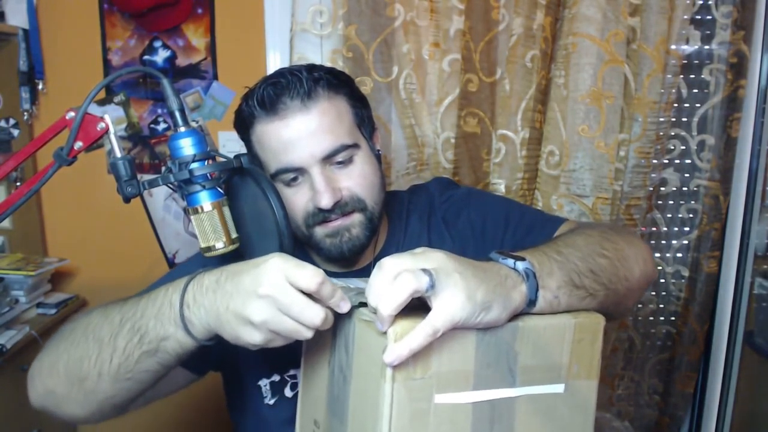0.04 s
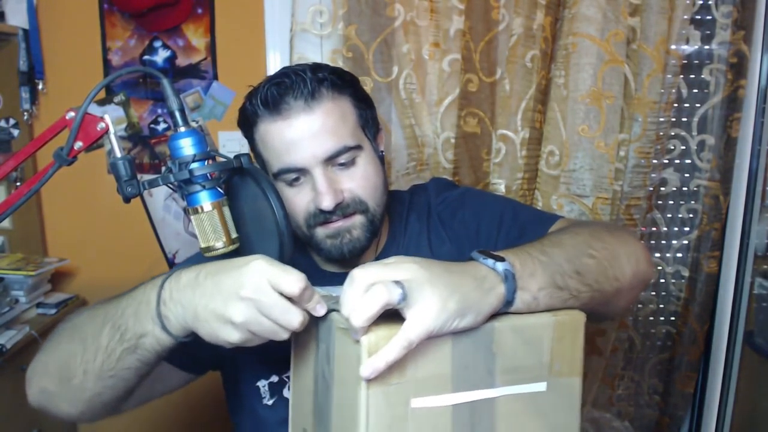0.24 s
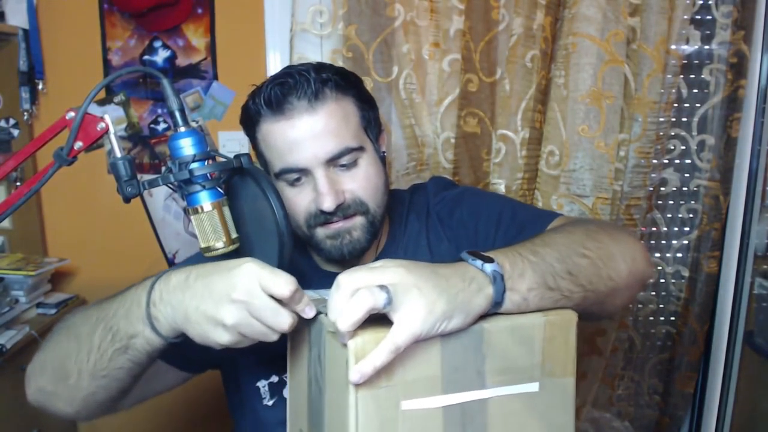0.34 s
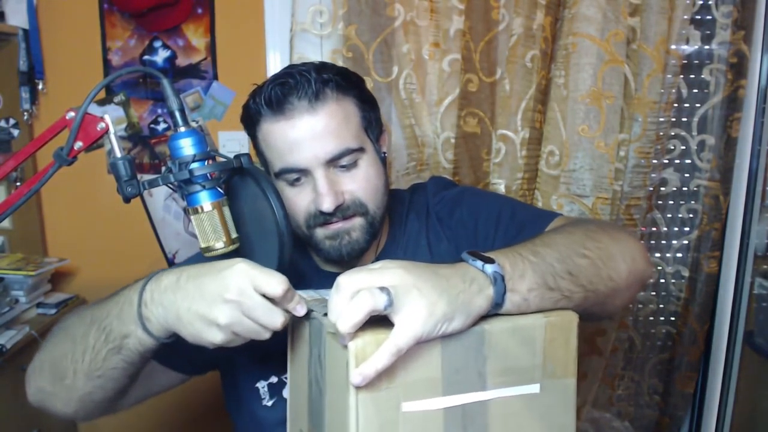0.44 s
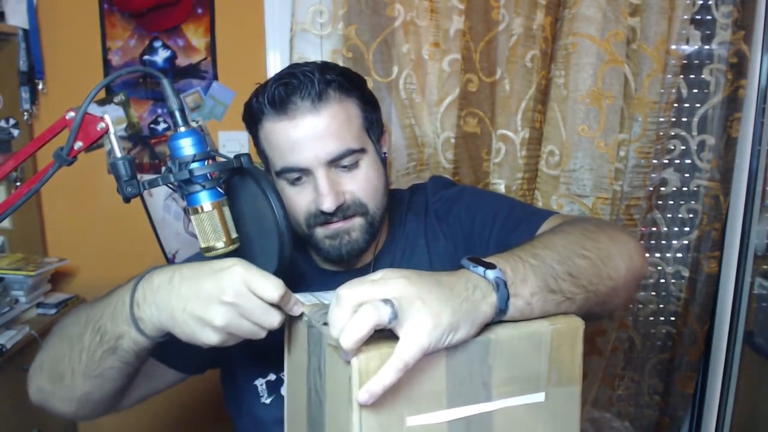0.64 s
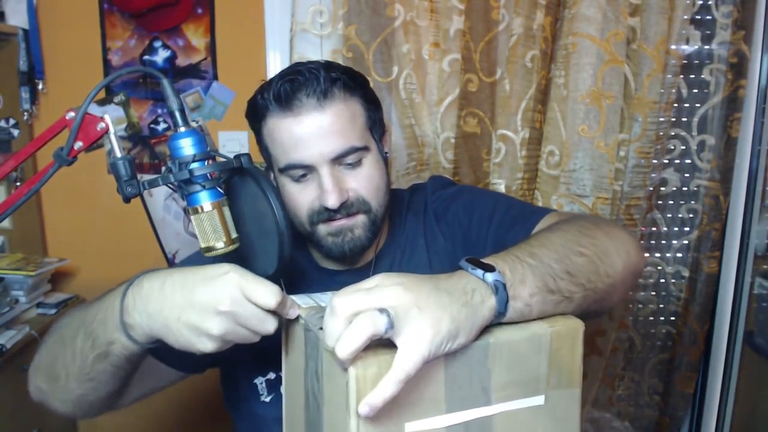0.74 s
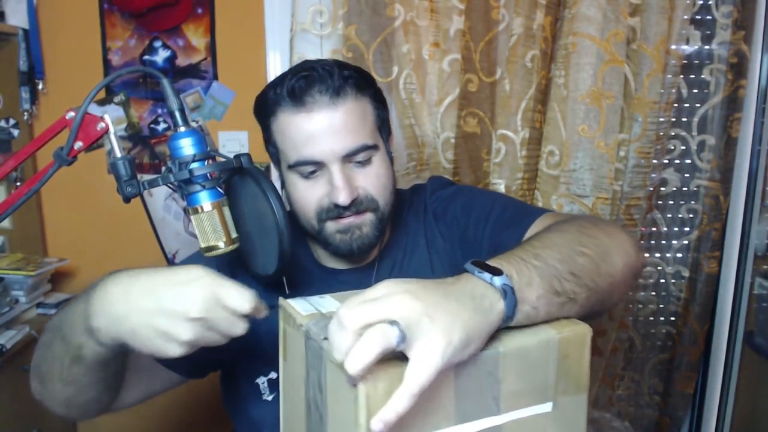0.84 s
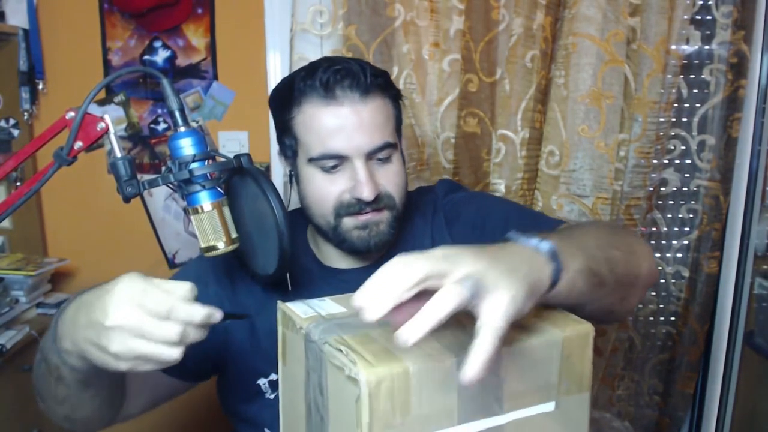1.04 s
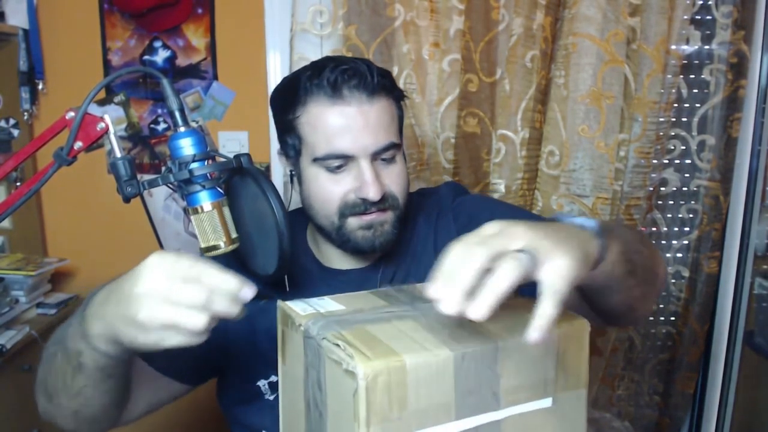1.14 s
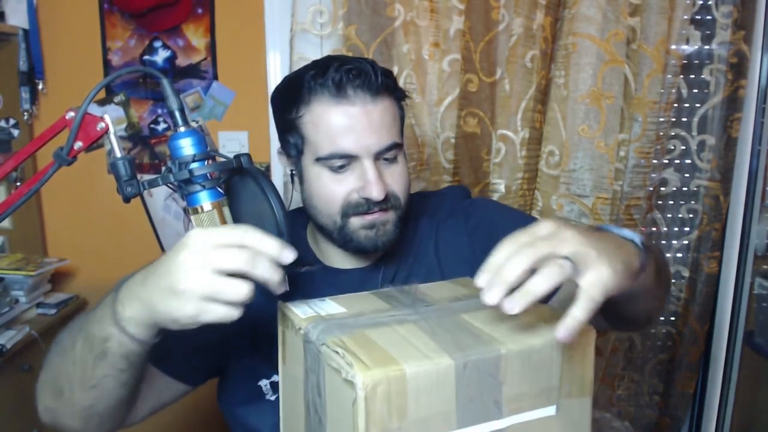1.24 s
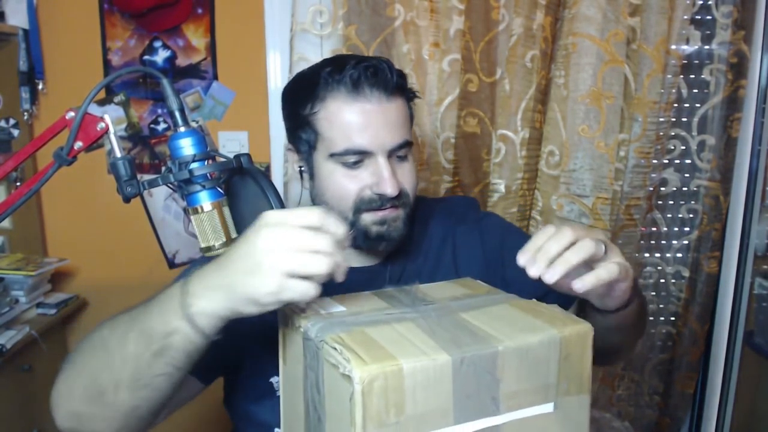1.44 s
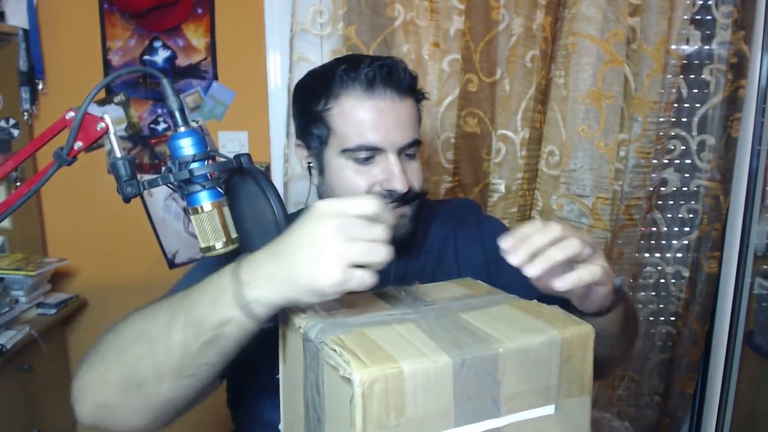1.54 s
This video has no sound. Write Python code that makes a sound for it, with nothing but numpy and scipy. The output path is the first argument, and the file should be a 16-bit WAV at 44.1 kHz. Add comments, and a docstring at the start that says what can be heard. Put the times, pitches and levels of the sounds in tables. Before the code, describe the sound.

Packing tape ripped off a cardboard box in short, crackling pulls with dull box knocks, indoors

```python
"""Packing tape ripped off a box

Tape is picked at and ripped off a cardboard box in short pulls, close to a desk microphone.
Stick-slip of the glue line crackles and snaps through filtered noise shaped by film resonances.
The box walls knock as damped sines and creak as clicks through modes; low noise shakes the desk.
Faint rustle, quiet noise and a mains hum lie underneath, and a small damped room adds its echo."""
import sys
import numpy as np
from scipy import signal
from scipy.io import wavfile
from scipy.ndimage import uniform_filter1d

SR = 44100
rng = np.random.default_rng(int(sys.argv[2]) if len(sys.argv) > 2 else 0)


def digitize_waveform(pressure):
    """Quantize a signal to 16-bit integers and store it at the path in sys.argv[1].

    Rows of a 2-D input are taken as channels; values are limited to [-1, 1].
    """
    field = np.atleast_2d(pressure).T
    bounded = np.clip(field, -1, 1)
    quanta = np.round(bounded * 32767).astype(np.int16)
    wavfile.write(sys.argv[1], SR, quanta)


N = 70560
GRAIN_LAG_S = 0.005  # crackle and creak follow their level tables this much later


def undb(db):
    """Level definition: dB to amplitude gain."""
    return 10 ** (np.asarray(db) / 20)


def unit(x):
    """Normalisation: scale to rms 1."""
    return x / np.sqrt(np.mean(x ** 2))


def decay(t, t60_s):
    """Exponential damping: a fall of 60 dB in t60_s."""
    return np.exp(-np.log(1000) * t / t60_s)


def band(x, hz, width_hz):
    """Simple resonance: a peak filter with gain 1 at the centre."""
    centre_hz = min(hz, 0.45 * SR)
    q = max(hz / width_hz, 0.3)
    return signal.lfilter(*signal.iirpeak(centre_hz, q, fs=SR), x)


def body(x, modes):
    """Modal superposition: twice-filtered resonances summed with alternating sign."""
    out = 0
    for k, (hz, width_hz, db) in enumerate(modes):
        pass_hz = 1.8 * width_hz  # each pass is wider, as two passes narrow the peak
        mode = band(band(x, hz, pass_hz), hz, pass_hz)
        out = out + (-1) ** k * undb(db) * mode
    return out


def cut(x, hz, kind, order=2):
    """Maximally flat filtering: a Butterworth low or high pass."""
    return signal.sosfilt(signal.butter(order, hz, kind, fs=SR, output="sos"), x)


def level(tables, column, lag_s=0):
    """Amplitude envelope: one dB column, interpolated through all tables, as gain."""
    rows = np.concatenate([np.array(table) for table in tables])
    t = np.arange(N) / SR - lag_s
    return undb(np.interp(t, rows[:, 0], rows[:, column]))


def clicks(per_s, spread_db):
    """Poisson-like impulses: random times and signs, with a long tail of sizes."""
    hits = rng.random(N) < per_s / SR
    signs = np.sign(rng.standard_normal(N))
    return hits * signs * undb(spread_db * rng.exponential(size=N))


def walk(per_s):
    """Slow random modulation: held random levels, smoothed twice, with spread near 1."""
    hold = int(SR / per_s)
    steps = np.repeat(rng.standard_normal(N // hold + 1), hold)
    return 1.3 * uniform_filter1d(uniform_filter1d(steps, hold), hold)[:N]


def even(x, span_s):
    """Level equalisation: hold the running rms of a noise near 1."""
    power = uniform_filter1d(x ** 2, int(span_s * SR))
    return x / np.sqrt(power + 1e-18)


def hiss(spectrum, flicker_db):
    """Filter-bank synthesis: narrow noise bands follow a spectrum and flicker independently."""
    f, density_db = np.array(spectrum).T
    octaves = np.arange(0, np.log2(f[-1] / f[0]), 1 / 5)
    out = 0
    for hz in f[0] * 2 ** octaves:
        db = np.interp(np.log(hz), np.log(f), density_db) + flicker_db * walk(24)
        noise = rng.standard_normal(N)
        for _ in range(3):
            noise = band(noise, hz, hz / 4)
        out = out + undb(db) * noise
    return unit(out)


# relative spectrum of the rustle: f/Hz, level/dB (per Hz)
RUSTLE_SPECTRUM = [(150, -3.5), (230, 4.5), (360, 1), (480, -15.5), (680, -2.5), (850, -14.5), (1100, -28),
                   (1450, -29), (2100, -10.5), (2500, -21), (2800, -20), (3600, -27.5), (5000, -30.5),
                   (7500, -24.5), (10000, -30), (16000, -34)]
# rms level of the rustle over time: t/s, level/dB
RUSTLE_LEVEL = [
    [(0.0, -67), (0.024, -100), (0.058, -70.5), (0.14, -80)],
    [(0.7, -68), (0.718, -59), (0.744, -66.5), (0.8, -65)],
    [(1.2, -63), (1.22, -66), (1.528, -67), (1.6, -94.5)],
]
# relative spectrum of the quiet room: f/Hz, level/dB (per Hz)
QUIET_SPECTRUM = [(56, -33), (95, 3), (123, 5.5), (290, -34), (408, -24.5), (1420, -38), (2000, -43),
                  (2940, -44), (16000, -47)]
QUIET_DB, HUM_HZ, HUM_DB = -77, 120, -68.5  # rms levels


def air():
    """Broadband and tonal background: hand and cloth rustle over quiet noise and a sine hum."""
    rustle = level(RUSTLE_LEVEL, column=1) * hiss(RUSTLE_SPECTRUM, flicker_db=4.5)
    quiet = undb(QUIET_DB) * hiss(QUIET_SPECTRUM, flicker_db=1.0)
    hum = undb(HUM_DB) * np.sqrt(2) * np.sin(2 * np.pi * HUM_HZ * np.arange(N) / SR)
    return rustle + quiet + hum


# shaking of box and desk, one table a pull:
# t/s, low box modes level/dB, high box modes level/dB, desk rumble level/dB
SHAKES = [
    [(0.12, -79, -78, -56), (0.13, -97.5, -77, -73), (0.196, -62, -77, -48), (0.21, -39, -49.5, -40),
     (0.242, -23.5, -27.5, -31), (0.254, -35, -34.5, -20.5), (0.266, -40, -47.5, -41),
     (0.288, -49, -51, -30.5), (0.312, -49.5, -47, -32.5), (0.35, -79, -99, -42), (0.365, -71, -74, -47.5)],
    [(0.366, -88, -59, -43), (0.384, -42, -63, -36.5), (0.392, -39.5, -39, -52), (0.434, -53, -63.5, -43),
     (0.462, -50, -56, -30), (0.484, -39, -40, -32.5), (0.502, -45, -44.5, -25), (0.508, -49, -51, -30),
     (0.52, -47, -55, -39)],
    [(0.521, -26, -42, -23.5), (0.533, -62, -39, -21), (0.549, -23, -29, -25), (0.561, -27, -32, -29),
     (0.583, -30.5, -32, -37), (0.611, -65, -55.5, -24), (0.681, -71.5, -82, -56.5),
     (0.717, -60.5, -81.5, -56), (0.753, -68.5, -75.5, -38.5), (0.8, -62, -74.5, -40)],
    [(0.801, -70, -80, -36), (0.823, -68, -69.5, -55), (0.841, -47, -46, -44.5),
     (0.861, -43.5, -39.5, -37.5), (0.889, -34, -43.5, -58), (0.897, -43, -39, -20),
     (0.909, -35.5, -45, -27.5), (0.941, -66, -58, -32), (0.97, -52, -65, -31)],
    [(0.971, -70, -65, -44), (0.985, -64, -66, -47), (1.001, -49, -63, -41), (1.033, -33.5, -43.5, -23),
     (1.051, -58, -59.5, -41.5), (1.069, -55, -61, -41), (1.099, -66, -85, -49), (1.141, -71, -57, -42),
     (1.175, -71.5, -78, -47), (1.271, -71, -78.5, -48), (1.32, -70, -77.5, -56.5)],
]
SWAY_DB = -55.5  # steady low sway under the pulls


def shake(low_hz, high_hz):
    """Band-limited random vibration: low noise between two cut-offs, held near rms 1."""
    noise = cut(rng.standard_normal(N), high_hz, "low", order=6)
    return even(cut(noise, low_hz, "high"), 0.16)


def desk():
    """Structure-borne vibration: each tug shakes desk and stand over a steady sway."""
    rumble = level(SHAKES, column=3) * shake(10, 43.6)
    sway = undb(SWAY_DB) * shake(7, 33)
    return rumble + sway


# modes of the box: f/Hz, nominal width/Hz, level/dB (relative)
BOX_LOW = [(150, 68, -2.5), (195.4, 34, 4), (279, 34, -1.5), (332.3, 50, -5.5), (434, 73, -2)]
BOX_HIGH = [(531, 53, 6), (680, 76, -7.5), (810, 120, 2.5), (1100, 100, -7), (1450, 330, -4)]
CREAKS_PER_S, CREAK_SPREAD_DB = 2500, 2


def creak():
    """Impulsive excitation of modes: small slips shake the low and high box resonances."""
    slips = clicks(CREAKS_PER_S, CREAK_SPREAD_DB)
    out = 0
    for column, box in ((1, BOX_LOW), (2, BOX_HIGH)):
        out = out + level(SHAKES, column, GRAIN_LAG_S) * even(body(slips, box), 0.015)
    return out


# crackle, one table a pull:
# t/s, low film level/dB, high film level/dB, top film level/dB
PULLS = [
    [(0.12, -93, -99, -90), (0.164, -80, -75.5, -69), (0.204, -74, -79, -78.5), (0.21, -54, -52, -56),
     (0.214, -41, -48, -46), (0.22, -66, -59, -55), (0.226, -39, -34.5, -37.5), (0.244, -36.5, -40.5, -46),
     (0.264, -49.5, -51, -58), (0.308, -59.5, -53.5, -75), (0.334, -75.5, -83, -101),
     (0.35, -108, -89, -107), (0.365, -74, -90.5, -106)],
    [(0.366, -82, -80, -107), (0.376, -61.5, -80, -107), (0.38, -68.5, -76, -73), (0.386, -43.5, -46, -41),
     (0.392, -42, -47, -76), (0.4, -48.5, -50.5, -60.5), (0.414, -49.5, -54, -65.5),
     (0.436, -63.5, -69, -77), (0.454, -51.5, -61, -72), (0.484, -37.5, -43, -52.5),
     (0.496, -47, -47.5, -49.5), (0.53, -44.5, -42, -45.5)],
    [(0.531, -44, -41, -41), (0.541, -41, -37, -43), (0.549, -31, -32.5, -37), (0.559, -34, -34, -40.5),
     (0.587, -33, -36, -41), (0.601, -52, -53, -57.5), (0.653, -62, -62.5, -76), (0.681, -73, -77, -100),
     (0.703, -78, -79.5, -83), (0.715, -66, -65, -84.5), (0.757, -87, -85, -89), (0.8, -92.5, -96.5, -86.5)],
    [(0.801, -78, -79.5, -87), (0.821, -71, -77, -86), (0.827, -64, -55, -66), (0.849, -42.5, -42, -40),
     (0.867, -40.5, -36.5, -51), (0.945, -53.5, -49, -51.5), (0.951, -41.5, -41, -53),
     (0.969, -59.5, -68, -65.5), (0.98, -56, -50, -64.5)],
    [(0.981, -63, -63, -67), (0.989, -54.5, -54, -58.5), (1.019, -50.5, -53, -52),
     (1.029, -41.5, -51, -53.5), (1.047, -56.5, -56.5, -60), (1.083, -56, -65.5, -71.5),
     (1.109, -61, -61.5, -69), (1.137, -57, -51, -68), (1.175, -60.5, -62, -76), (1.233, -85, -89, -97),
     (1.259, -68.5, -67, -80), (1.299, -83.5, -83.5, -90), (1.32, -83.5, -89.5, -107)],
]
# resonances of the tape film: f/Hz, nominal width/Hz, level/dB (relative)
FILM_LOW = [(1640, 400, -5), (2136, 320, 6.5), (3113, 930, 6.5), (3519, 910, 12.5), (4400, 350, -1.5)]
FILM_HIGH = [(5470, 1000, -3), (6840, 830, 2.5), (7970, 900, 2), (8600, 900, -0.5), (9500, 870, 0)]
FILM_TOP = [(11070, 1200, 1), (11100, 2900, -1), (13600, 2600, -8), (15000, 1200, -13)]
GRAINS_PER_S, GRAIN_SPREAD_DB, GRAIN_SMEAR_S = 9000, 2.5, 0.0005
FILM_FLICKER_DB, FILM_FLICKER_PER_S = 2, 25


def crackle():
    """Stick-slip friction: dense glue-line grains ring film resonances that swell independently."""
    smear = np.exp(-1 / (GRAIN_SMEAR_S * SR))
    out = 0
    for column, film in ((1, FILM_LOW), (2, FILM_HIGH), (3, FILM_TOP)):
        impulses = np.abs(clicks(GRAINS_PER_S, GRAIN_SPREAD_DB))
        grains = signal.lfilter([1], [1, -smear], impulses)
        rasp = grains * rng.standard_normal(N)
        rung = 0
        for k, mode in enumerate(film):
            swell = undb(FILM_FLICKER_DB * walk(FILM_FLICKER_PER_S))
            rung = rung + swell * (-1) ** k * body(rasp, [mode])
        out = out + level(PULLS, column, GRAIN_LAG_S) * even(rung, 0.024)
    return out


# snaps of the glue letting go: t/s, peak level/dB, ring f/Hz, burst decay t60/s,
# ring gain level/dB, treble gain level/dB
SNAPS = [(.156, -49.5, 9070, 0.018, 14, 0), (0.2131, -23.5, 2980, .012, 3.5, -5.5),
         (0.2281, -8, 9600, 0.0086, -1.5, 2), (0.238, -13.5, 3600, 0.0078, 8, 2.5),
         (0.2405, -11.5, 9600, 0.018, 8, -10), (0.25, -24, 3950, 0.0098, 6, -2),
         (.303, -42, 7340, .02, 10, -9), (.389, -19, 3970, 0.0092, 26.5, 10),
         (.468, -39, 3800, 0.011, 15, -7), (0.4847, -29.5, 3400, .012, 13, -2),
         (0.5483, -8, 2950, 0.01, 4, 7), (.562, -13, 2810, 0.0091, 9, 2),
         (0.576, -12.5, 7800, .012, 6, 0.5), (0.5793, -10, 9100, 0.015, 14, 9),
         (0.5863, -14.5, 3320, 0.011, 4, 3), (0.7147, -50.5, 6640, 0.014, 24, -19),
         (0.831, -37.5, 7570, 0.019, 15, -0.5), (.844, -26.5, 8150, 0.024, 16, -1),
         (0.852, -19, 7770, 0.0089, 29, 9), (.863, -20.5, 9900, 0.024, 20, 6),
         (.870, -21, 7040, 0.0084, 2, 4), (.9503, -27, 2300, .02, 13, 4), (0.9902, -32, 2870, 0.01, 5, 5.5),
         (1.028, -20.5, 4060, 0.0092, 15, -23), (1.129, -34.5, 6700, 0.019, 9, -4.5),
         (1.1789, -49, 2100, .012, 14.5, 0), (1.2603, -48, 5600, .02, 16, -3.5)]
SNAP_RING_Q, SNAP_RISE_S, SNAP_TICK_DB = 3.2, 0.0001, 13


def snaps():
    """Sudden release of strain: a tick and a decaying noise burst excite film and one ring."""
    length = 4096
    out, t = np.zeros(N + length), np.arange(length) / SR
    for start_s, peak_db, hz, t60_s, ring_db, treble_db in SNAPS:
        rise = 1 - np.exp(-t / SNAP_RISE_S)
        burst = rng.standard_normal(length) * rise * decay(t, max(t60_s, 0.003))
        burst[2:4] += undb(SNAP_TICK_DB) * np.array([1, -1])  # tick
        ring = undb(ring_db) * body(burst, [(hz, hz / SNAP_RING_Q, 0)])
        treble = undb(treble_db) * body(burst, FILM_HIGH + FILM_TOP)
        snap = body(burst, FILM_LOW) + treble + ring
        i = int(start_s * SR)
        out[i:i + length] += undb(peak_db) * snap / np.max(np.abs(snap))
    return out[:N]


# knocks of the box wall: t/s, undamped amplitude level/dB, f/Hz, decay t60/s
KNOCKS = [(.213, -19.5, 78.4, 0.03), (0.214, -20, 445, 0.0092), (.233, -17.5, 97.3, 0.11),
          (0.245, -13.5, 80.5, 0.099), (0.25, -17.5, 204, 0.032), (.252, -17.5, 439, 0.051),
          (0.39, -19, 72, 0.068), (0.391, -26, 455, 0.032), (0.464, -17, 62.4, 0.054), (0.5, -18, 60, 0.05),
          (.536, -14, 78.2, 0.066), (0.551, -20, 219, 0.047), (.555, -21, 323, 0.07),
          (0.564, -18.5, 352, 0.033), (.575, -25, 436, 0.018), (.717, -47, 330, 0.041),
          (0.862, -18.5, 77, 0.072), (0.894, -20, 76.7, 0.087), (.896, -25.5, 729, 0.033),
          (.905, -30, 699, 0.081), (0.993, -20, 86, 0.022), (1.027, -20, 322, 0.026),
          (1.135, -44.5, 696, 0.032)]


def knocks():
    """Damped free vibration: each knock is a decaying sine of the box wall."""
    length = 8192
    out, t = np.zeros(N + length), np.arange(length) / SR
    for start_s, db, hz, t60_s in KNOCKS:
        i = int(start_s * SR)
        swing = np.sin(2 * np.pi * hz * t) * decay(t, max(t60_s, 0.005))
        out[i:i + length] += undb(db) * swing
    return out[:N]


ROOM_T60_S, ROOM_DB, ROOM_DAMP_HZ = 0.15, -19.5, 8900


def room(x):
    """Diffuse reverberation: convolution with decaying noise, duller than the source."""
    t = np.arange(SR // 2) / SR
    tail = cut(rng.standard_normal(len(t)), ROOM_DAMP_HZ, "low", order=1) * decay(t, ROOM_T60_S)
    tail = tail / np.sqrt(np.sum(tail ** 2))
    return signal.fftconvolve(cut(x, 200, "high"), tail)[:N]


SIDE_DB, SIDE_HZ = -25, 600


def scene():
    """Sum and difference: nearly mono, left and right differing by a faint hiss that follows the sound."""
    tape = crackle() + snaps() + knocks() + creak()
    mid = tape + undb(ROOM_DB) * room(tape) + desk() + air()
    # convolution with short noise smears the sound into the hiss
    smear = rng.standard_normal(1024) / np.sqrt(1024)
    bright = cut(cut(mid, SIDE_HZ, "high", order=1), 120, "high", order=1)
    side = undb(SIDE_DB) * signal.fftconvolve(bright, smear)[:N]
    return np.array([mid + side, mid - side])


TOP_HZ = 16000


def record(dry):
    """Band limitation: a steep elliptic low pass removes the top."""
    return signal.sosfilt(signal.ellip(8, 0.2, 75, TOP_HZ, fs=SR, output="sos"), dry)


dry = scene()
out = record(dry)
digitize_waveform(out)
```